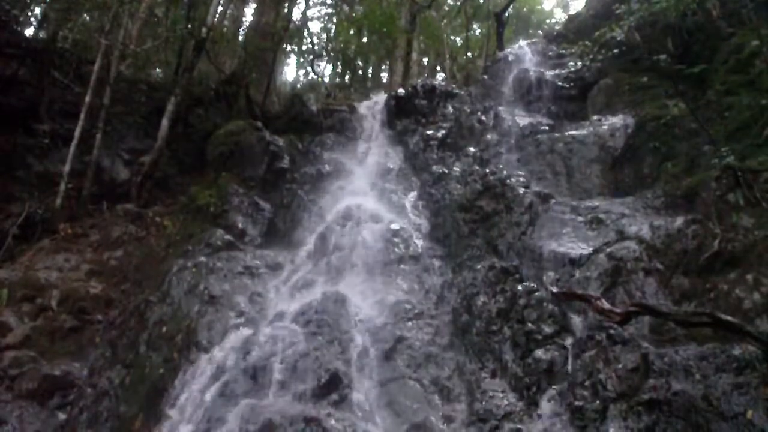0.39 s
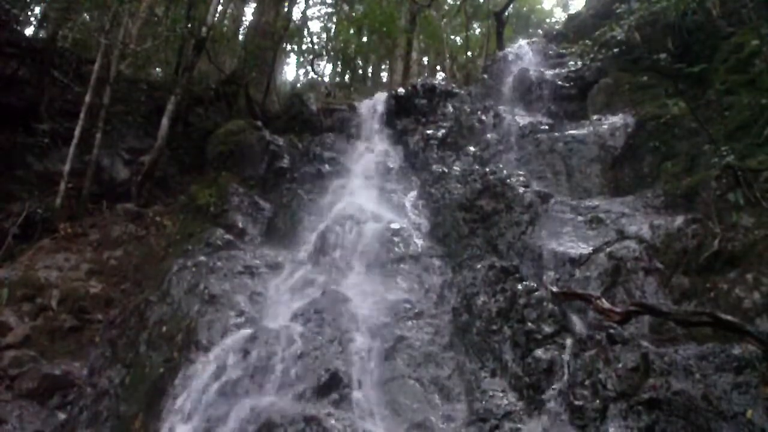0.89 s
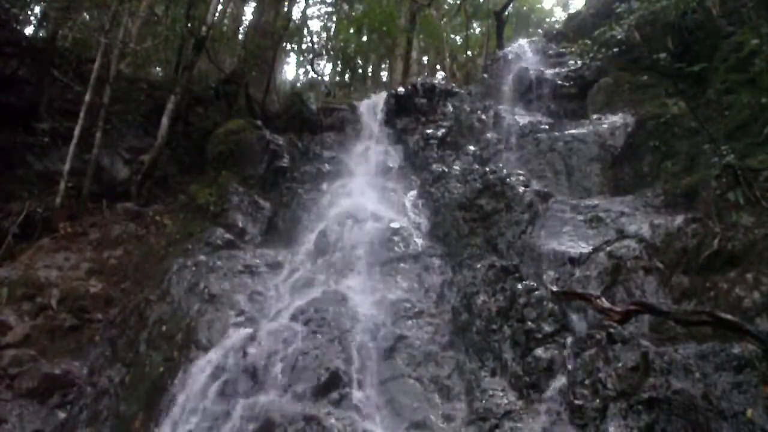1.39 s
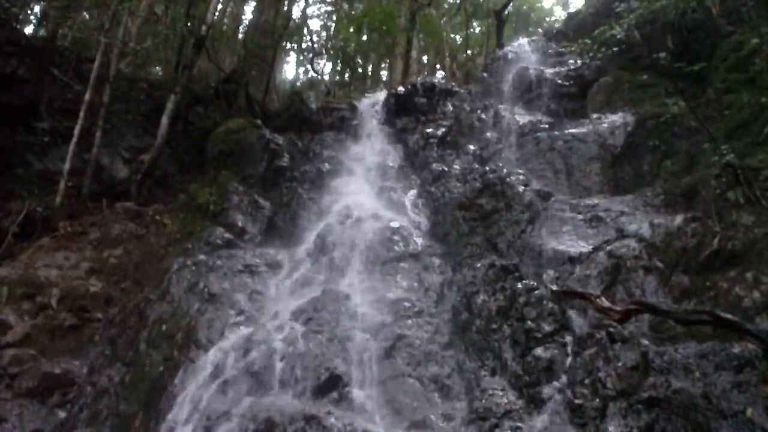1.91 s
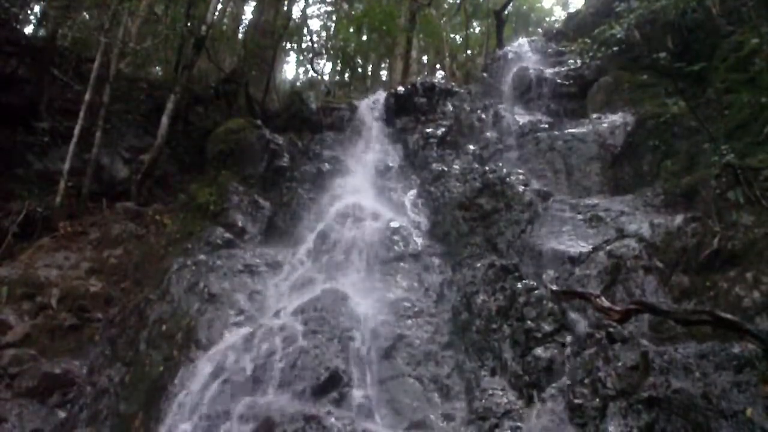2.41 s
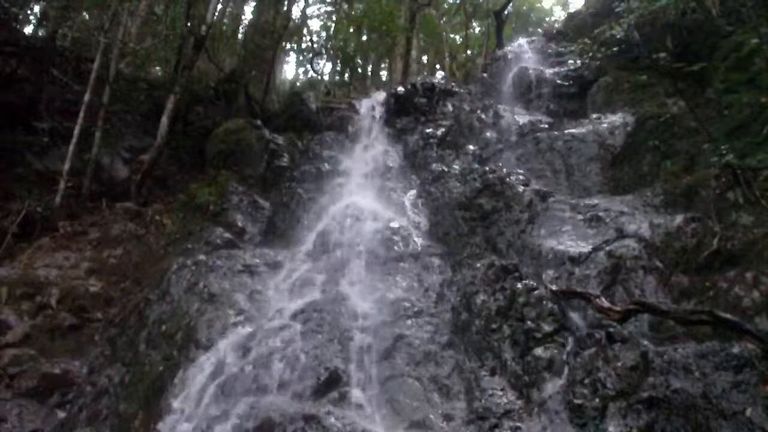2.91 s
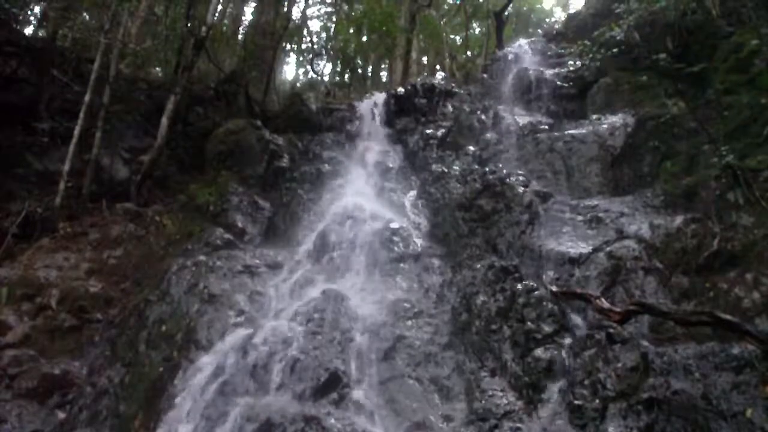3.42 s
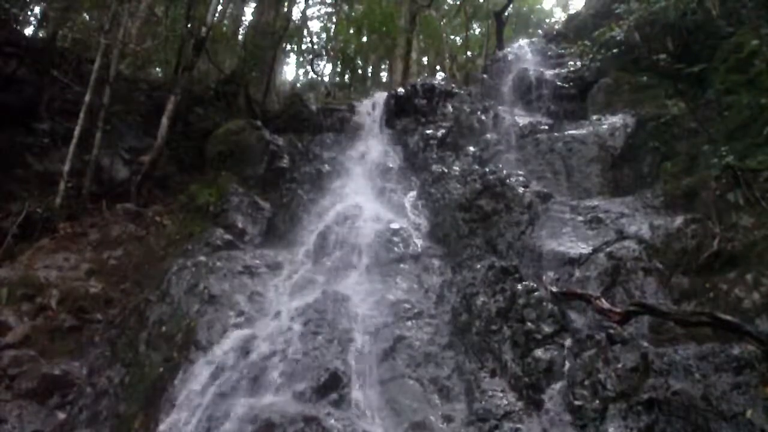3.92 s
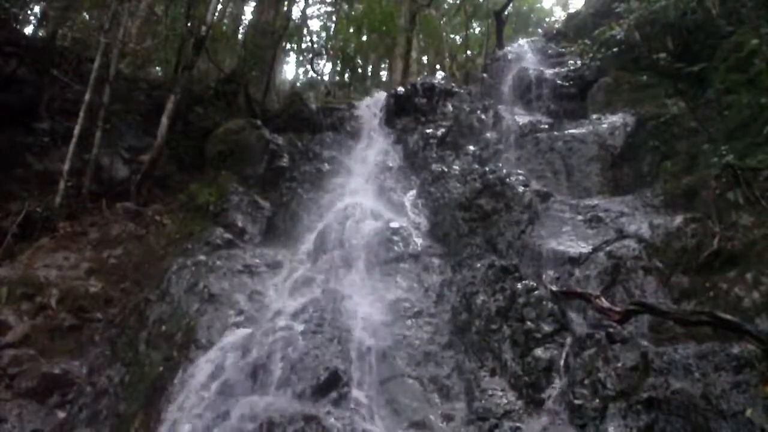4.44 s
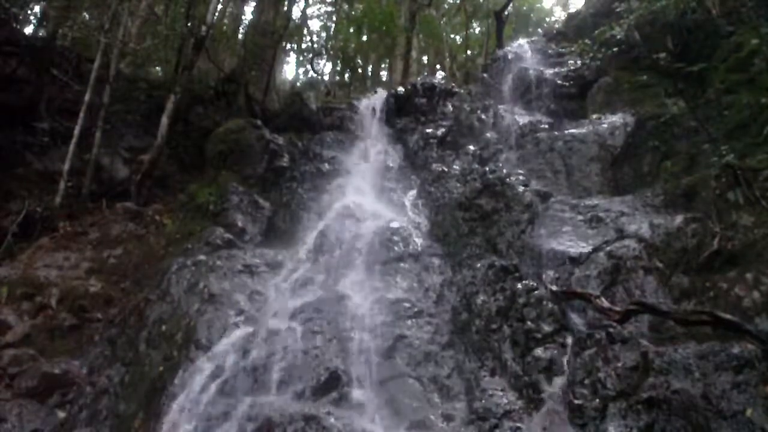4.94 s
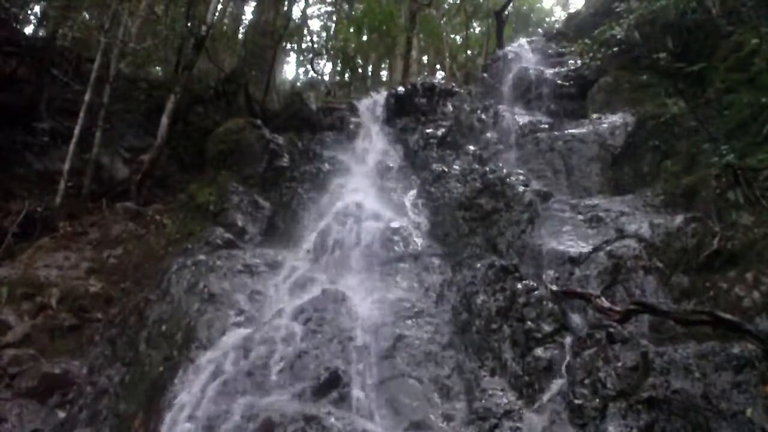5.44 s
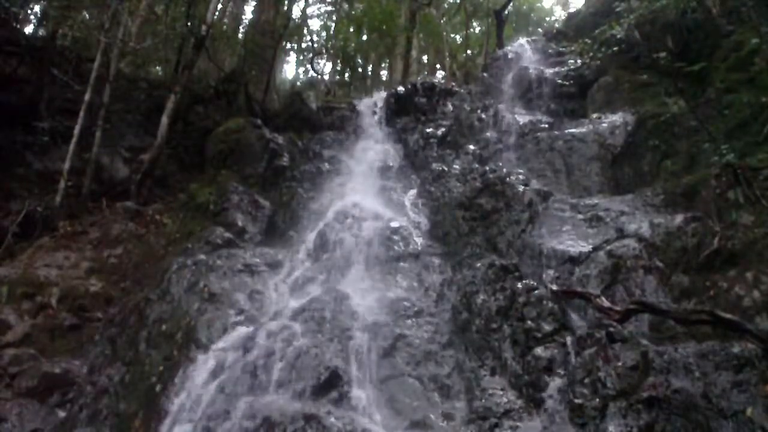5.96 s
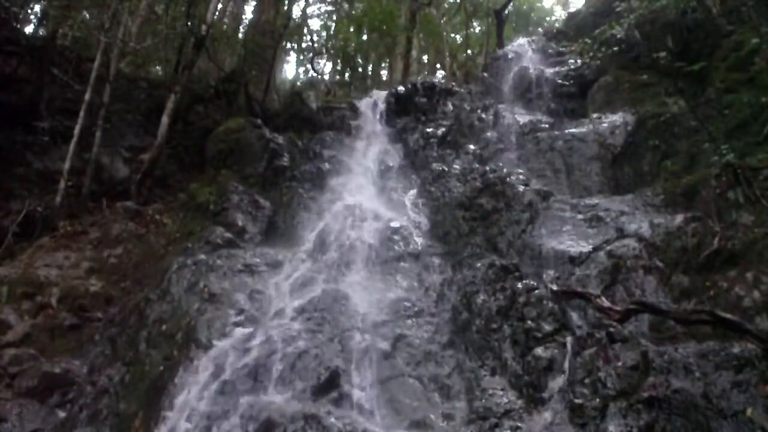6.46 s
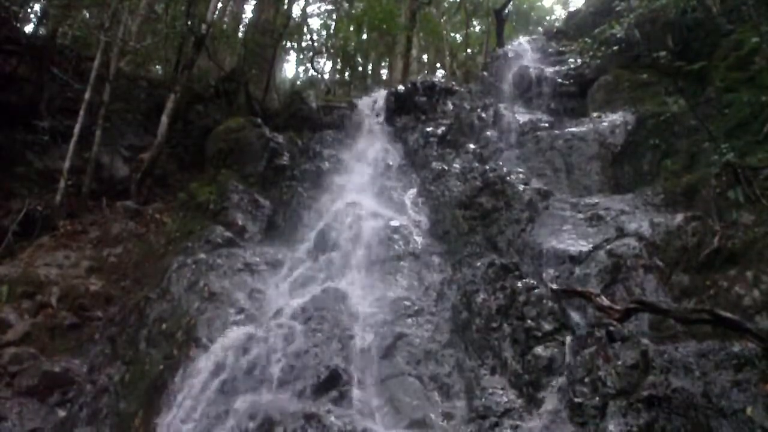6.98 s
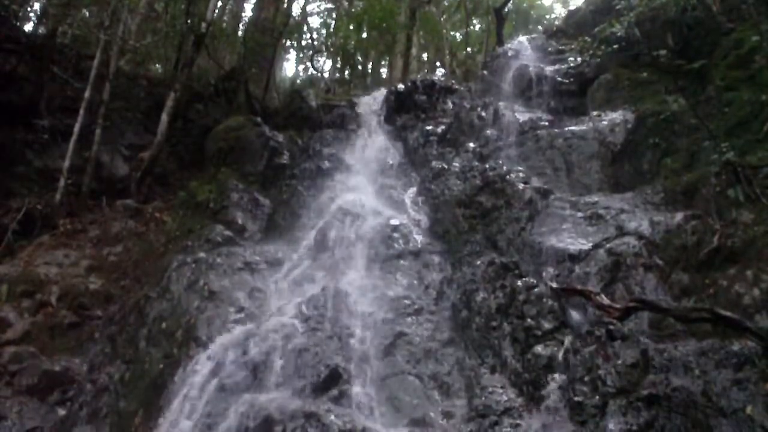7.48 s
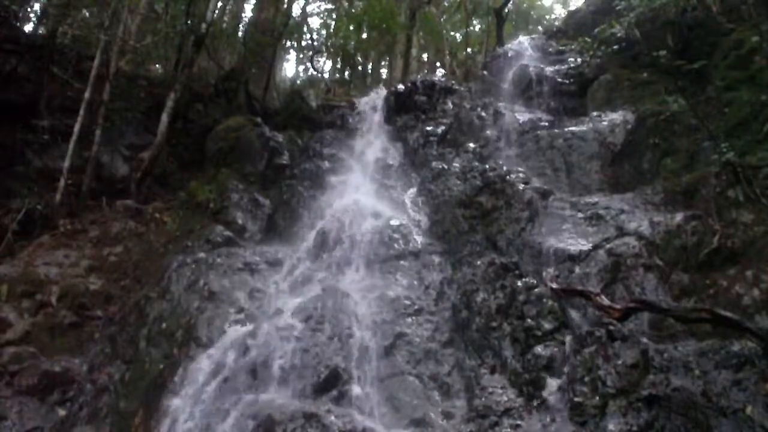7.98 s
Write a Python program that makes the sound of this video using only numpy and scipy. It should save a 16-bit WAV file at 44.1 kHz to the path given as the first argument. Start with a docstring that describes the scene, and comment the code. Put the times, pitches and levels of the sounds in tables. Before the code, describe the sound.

A narrow waterfall fans over bare rock in a forest, heard very close through one small microphone. A bright, continuous hiss flickers with thousands of tiny ticking drops. Sharp splats strike near stone several times a second, the hardest making the whole rush dip briefly and creep back. Faint low gurgles lie underneath. No fade, little bass, no echo.

```python
"""In a forest, a narrow waterfall fans out over a rock face, heard close by through one small microphone.
Sheets of water hiss as noise flickering in octave bands; drops tick or ring as struck damped resonators.
Splats are short tone bursts, each with a brief swell of the spray; gurgles are longer, low tone bursts.
The hardest splats trip the gain control, which ducks at once, waits and creeps back."""
import sys
import numpy as np
from scipy import signal
from scipy.fft import rfft, irfft
from scipy.io import wavfile
from scipy.ndimage import minimum_filter1d

SR = 44100
rng = np.random.default_rng(int(sys.argv[2]) if len(sys.argv) > 2 else 0)


def unload_audio(sound):
    """Save the sound as a 16-bit wav file, at the path given as the first command line argument."""
    columns = np.transpose(np.atleast_2d(sound))
    # keep every value between -1 and 1, then stretch to whole-number steps
    steps = np.round(np.clip(columns, -1, 1) * 32767)
    wavfile.write(sys.argv[1], SR, steps.astype(np.int16))


def to_linear_factor(level_db):
    """Convert decibel levels (scalar or array-like) to linear amplitude factors."""
    exponent = np.asarray(level_db, float) / 20
    return 10 ** exponent


N = 357651   # length of the scene [samples]

# drops: median strikes per second, decay of the ring by 60 dB [cycles], level beside the hiss [dB]
DROPS_PER_S, DROP_CYCLES, DROPS_DB = 2500, 6.8, -8
BUBBLES_PER_S, BUBBLE_CYCLES, BUBBLES_DB = 120, 18, -18.5
TICKS_PER_S, TICKS_DB = 440, -9.5
DROP_SPREAD_DB = 2.5   # scale of the exponential spread of strike sizes

# splats: length of the ring and of the swell of spray
SPLAT_S, SWELL_S = 0.0013, 0.009
# lighter splats: rate, lowest ring peak and range above it, pitch range, largest swell
LIGHT_PER_S, LIGHT_DB, LIGHT_SPREAD_DB = 8, -11.5, 7
LIGHT_LOW_HZ, LIGHT_HIGH_HZ, LIGHT_SWELL_DB = 2460, 8000, 1.5

GURGLE_CYCLES = 14

# gain control: threshold, time constants of level and gain, hold time, recovery rate
DUCK_ABOVE_DB, LISTEN_S, ATTACK_S, HOLD_S, RECOVER_DB_PER_S = -11, 0.0027, 0.00063, 0.084, 16.5
# microphone path: ceiling of the rounded peaks, low cut, treble null, top cut
PEAK_TOP, LOW_CUT_HZ = 0.82, 60
NULL_HZ, NULL_WIDTH_HZ, CUTOFF_HZ = 11250, 2540, 15330


def scene():
    """Superposition: water scaled by flow and spray adds to rings and gurgles, alike in both channels."""
    # surges of the flow: (time [s], level of the water before the spray swells [dB])
    surges = [(0, -15), (.25, -12.5), (.45, -14), (.9, -12.5), (1.3, -14.5), (1.8, -10.5), (2.3, -14.5),
              (2.75, -13.5), (3.3, -14), (4.3, -14.5), (5.0, -14), (5.35, -14.5), (5.7, -12), (6.4, -14),
              (7.0, -13.5), (7.6, -13.5), (8.11, -13)]
    time_s, level_db = np.transpose(surges)
    flow = to_linear_factor(np.interp(np.arange(N) / SR, time_s, level_db))
    water = coloured(sheets(shared_db=0.34, own_db=0.72) + drops())
    rings, spray = splats()
    mix = flow * spray * water + rings + gurgles()
    return np.tile(mix, (2, 1))


def sheets(shared_db, own_db):
    """Amplitude-modulated noise: flat hiss in octave bands that flicker partly together, partly alone."""
    spectrum, hz = rfft(rng.standard_normal(N)), np.fft.rfftfreq(N, 1 / SR)
    octave = np.log2(np.maximum(hz, 125) / 125)
    together = drift(21) + drift(70)
    out = np.zeros(N)
    for k in range(9):
        weight = np.maximum(1 - np.abs(octave - k), 0)   # overlapping bands sum to one
        band = irfft(spectrum * weight, N)
        depth = max(k - 2, 0) / 4   # bands up to 500 Hz stay smooth; full depth at 8 kHz
        flicker_db = shared_db * together + own_db * drift(25)
        out += band * to_linear_factor(flicker_db * depth)
    return rms_one(out)


def drops():
    """Damped resonance: small drops ring high, trapped bubbles low; drops on bare stone only tick."""
    small = ringing(DROPS_PER_S, np.linspace(2500, 15000, num=24), DROP_CYCLES)
    bubbles = ringing(BUBBLES_PER_S, np.linspace(150, 500, num=12), BUBBLE_CYCLES)
    ticks = rms_one(np.diff(strikes(TICKS_PER_S), prepend=0))   # differencing leaves a dry tick no bass
    return to_linear_factor(DROPS_DB) * small + to_linear_factor(BUBBLES_DB) * bubbles + to_linear_factor(TICKS_DB) * ticks


def ringing(per_s, pitches, cycles):
    """Impulse excitation of a bank of resonators: each strike rings at one pitch drawn by chance."""
    clicks = strikes(per_s)
    dealt = rng.integers(0, len(pitches), N)
    return rms_one(sum(ring(clicks * (dealt == k), hz, cycles) for k, hz in enumerate(pitches)))


def ring(clicks, hz, cycles):
    """Two-pole resonator: a unit click starts a near-unit sine that falls 60 dB in the given cycles."""
    r, w = to_linear_factor(-60 * hz / (cycles * SR)), 2 * np.pi * hz / SR
    return signal.lfilter([0, np.sin(w)], [1, -2 * r * np.cos(w), r * r], clicks + 1e-18)


def strikes(per_s):
    """Random point process of drifting rate: sparse impulses of uneven size that come in clumps."""
    size_db = DROP_SPREAD_DB * np.minimum(rng.exponential(1, N), 3.0)
    sizes = to_linear_factor(size_db) * rng.choice([-1, 1], N)
    rate = per_s * to_linear_factor(3.0 * drift(30))
    return sizes * (rng.random(N) < rate / SR)


def coloured(x):
    """Spectral shaping: a fixed frequency response gives a flat noise the colour of the fall."""
    # colour of the falling water: (frequency [Hz], relative level per Hz [dB])
    rush = [(20, -57), (70, -34.5), (120, -26), (160, -20.5), (250, -16.5), (650, -8.5), (1000, -4.5),
            (2000, -3.5), (3000, -2.5), (5000, -1.5), (9000, -3), (10500, -6), (12500, -6.5), (14600, -7)]
    # resonances and dips of rock hollows and microphone housing: (centre [Hz], width [Hz], height [dB])
    hollows = [(254, 45, 4), (310, 30, 2.5), (353, 37, -2), (424, 38, 1.5), (1325, 310, 2),
               (1610, 130, -1.5), (2340, 370, 2), (3640, 310, 2), (5800, 710, -2), (7550, 1800, 3.5)]
    hz = np.maximum(np.fft.rfftfreq(N, 1 / SR), 1)
    at_hz, level_db = np.transpose(rush)
    response_db = np.interp(np.log(hz), np.log(at_hz), level_db)
    for centre_hz, width_hz, bump_db in hollows:
        response_db += bump_db / (1 + (2 * (hz - centre_hz) / width_hz) ** 2)
    return rms_one(irfft(rfft(x) * to_linear_factor(response_db), N))


def splats():
    """Transient tone bursts, each near the end of a brief swell of spray; returns rings and spray gain."""
    # hard splats on near stone: (time [s], ring peak [dB], ring frequency [Hz], swell of the spray [dB])
    hard_splats = [(.289,-10,3060,4),(.586,-10,8200,3.5),(.991,-7,6350,3.5),(1.187,-7,7900,3),(1.492,-3,7200,2.5),(1.647,-7,3470,1),(1.906,-9,7550,5.5),(2.332,-8,3650,4),(2.7516,-2.5,7300,3.5),(2.784,-3,6700,3),(3.219,-6.5,7420,2.5),(3.592,-10,7600,4.5),(3.809,-7,7400,2.5),(4.019,-4.5,3900,6.5),(4.3225,-4.5,4440,5.5),(4.448,-7,4300,1.5),(4.543,-4,4170,0),(4.569,-7,4250,3),(4.59,-3,4190,4.5),(5.293,-11,7400,3.5),(5.6595,-5,2820,1),(5.6775,-8,7660,1.5),(5.843,-6,7800,4),(6.091,-10,7600,4.5),(6.329,-3,7470,1.5),(6.567,-10,3640,4),(6.7355,-3.5,5300,3.5),(7.038,-8,7860,4.5),(7.333,-7,2440,4),(7.476,-13,2390,5.5),(7.755,-11,7800,4),(8.037,-3,2920,-0.5)]
    rings, swell_db = np.zeros(N), np.zeros(N)
    ramp = np.linspace(0, 1, int(SWELL_S * SR))
    for s, peak_db, hz, spray_db in hard_splats + light_splats():
        add(rings, s + SPLAT_S / 2, to_linear_factor(peak_db) * swelling_tone(hz, SPLAT_S))
        add(swell_db, s + 2 * SPLAT_S - SWELL_S, spray_db * ramp)
    return rings, to_linear_factor(swell_db)


def light_splats():
    """Random impacts: rows like those of the hard splats, uniform in time and in log frequency."""
    when, size, pitch, swell = rng.random((int(LIGHT_PER_S * N / SR), 4)).T
    peak_db = LIGHT_DB + LIGHT_SPREAD_DB * size
    hz = LIGHT_LOW_HZ * (LIGHT_HIGH_HZ / LIGHT_LOW_HZ) ** pitch
    return list(zip(when * N / SR, peak_db, hz, LIGHT_SWELL_DB * swell))


def gurgles():
    """Bubble resonance: large bubbles ring low, so a fixed count of cycles lasts longer."""
    # deep bubbles in the pools between the rocks: (time [s], peak level [dB], ring frequency [Hz])
    deep_bubbles = [(0.225, -30, 396), (0.399, -33, 248), (0.918, -34, 253), (1.576, -30, 260),
                    (2.243, -40, 202), (3.342, -31, 420), (4.259, -29.5, 402), (7.016, -37, 438)]
    out = np.zeros(N)
    for s, peak_db, hz in deep_bubbles:
        add(out, s, to_linear_factor(peak_db) * swelling_tone(hz, GURGLE_CYCLES / hz))
    return out


def swelling_tone(hz, length_s):
    """Tone burst: a sine under a sine-squared envelope that peaks at 1 halfway."""
    t = np.arange(int(length_s * SR)) / SR
    envelope = np.sin(np.pi * t / length_s) ** 2
    return envelope * np.sin(2 * np.pi * hz * t)


def add(out, s, sound):
    """Superposition: adds a signal into another from a given time on."""
    at = max(round(s * SR), 0)
    out[at:at + len(sound)] += sound[:N - at]


def drift(rate):
    """Low-pass noise: two equal poles at rate [Hz] leave a slow random drift of unit rms."""
    r = np.exp(-40 * np.pi * rate / SR)   # computed at every 20th sample
    noise = rng.standard_normal(N // 20 + 2002)
    slow = signal.lfilter([1], [1, -2 * r, r * r], noise)[2000:]   # leaves out the run-in
    return np.interp(np.arange(N) / 20, np.arange(len(slow)), rms_one(slow))


def rms_one(x):
    """Normalisation of power: scales to unit rms."""
    return x / np.sqrt(np.mean(x ** 2) + 1e-20)


def gain_control(x):
    """Dynamic compression: loud instants push the gain down fast; it holds, then climbs at a steady rate."""
    k = np.exp(-1 / (LISTEN_S * SR))
    level_db = 10 * np.log10(signal.lfilter([1 - k], [1, -k], x ** 2) + 1e-12)
    cut_db = np.minimum(DUCK_ABOVE_DB - level_db, 0)
    hold = int(HOLD_S * SR)
    padded_db = np.r_[np.zeros(hold), cut_db]
    held_db = minimum_filter1d(padded_db, size=hold)[hold - hold // 2:][:N]   # looks back only
    climb_db = RECOVER_DB_PER_S * np.arange(N) / SR
    gain_db = np.minimum(np.minimum.accumulate(held_db - climb_db) + climb_db, 0)
    k = np.exp(-1 / (ATTACK_S * SR))
    return x * to_linear_factor(signal.lfilter([1 - k], [1, -k], gain_db))


def band_limit(x):
    """A steep low-pass at the top of the band."""
    return signal.sosfilt(signal.butter(12, 16630, fs=SR, output="sos"), x)


def record(dry):
    """Gain control, soft saturation and linear filtering: low cut, deep fixed treble null, steep top cut."""
    x = gain_control(dry[0])
    x = x / (1 + (x / PEAK_TOP) ** 6) ** (1 / 6)   # rounds the peaks
    x = signal.sosfilt(signal.butter(2, LOW_CUT_HZ, "high", fs=SR, output="sos"), x)
    r, c = np.exp(-np.pi * NULL_WIDTH_HZ / SR), np.cos(2 * np.pi * NULL_HZ / SR)
    x = signal.lfilter([r, -2 * r * c, r], [1, -2 * r * c, r * r], x)   # zeros on the unit circle: a null
    x = signal.sosfilt(signal.ellip(12, 0.1, 80, CUTOFF_HZ, fs=SR, output="sos"), x)
    return band_limit(np.tile(x, (2, 1)))


dry = scene()
out = record(dry)
unload_audio(out)
```